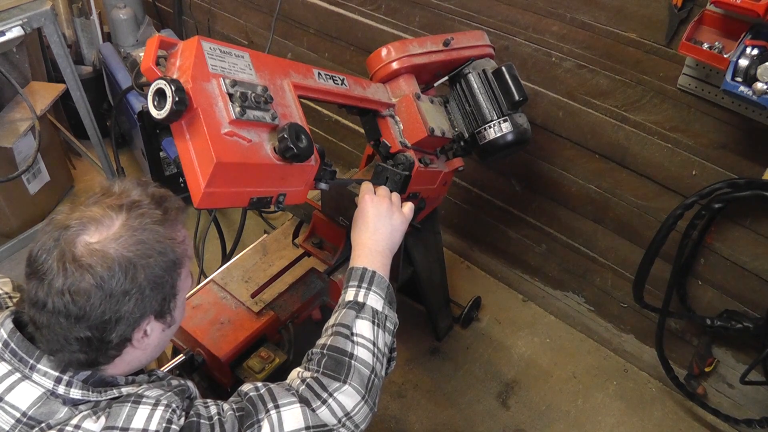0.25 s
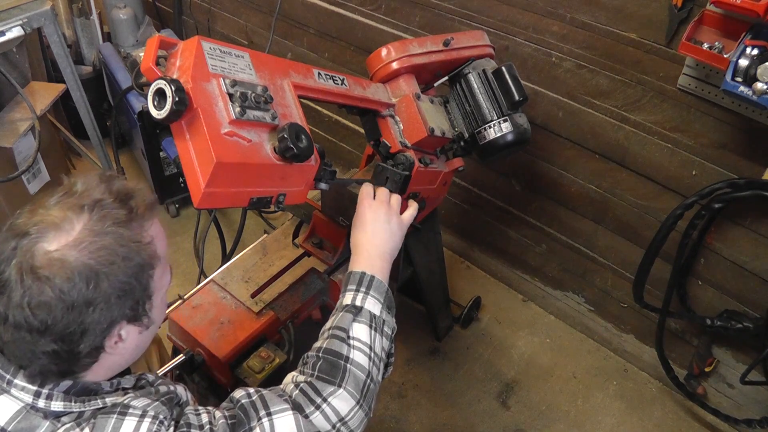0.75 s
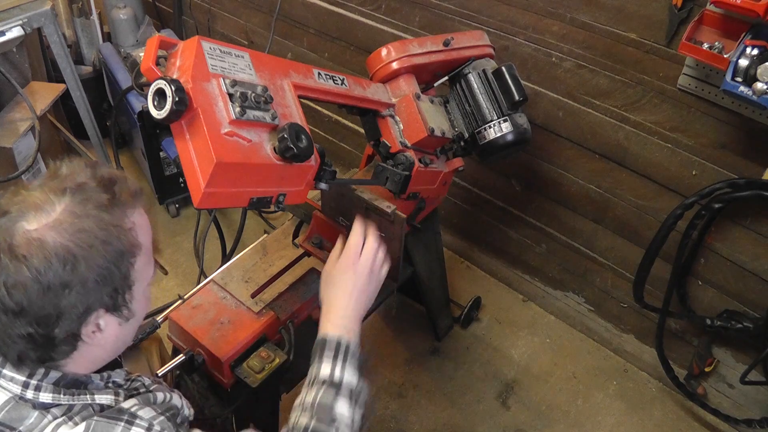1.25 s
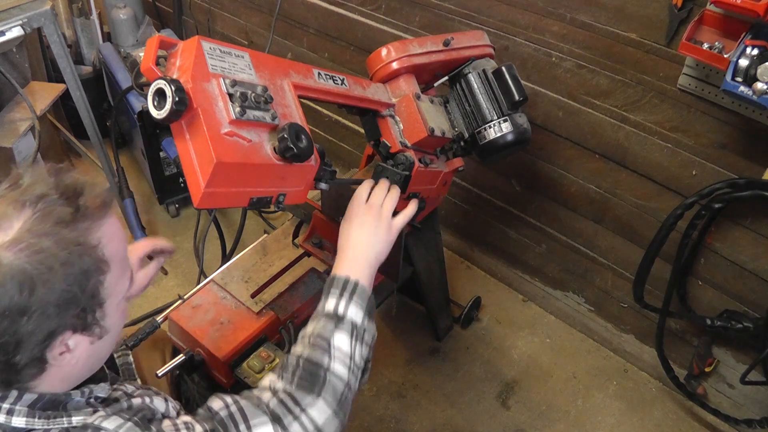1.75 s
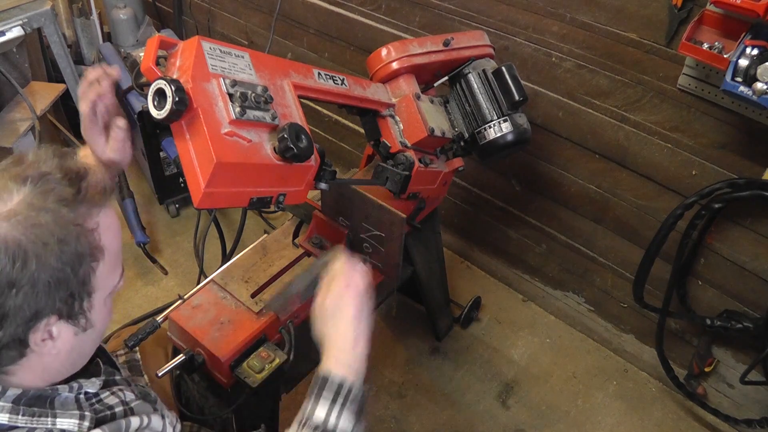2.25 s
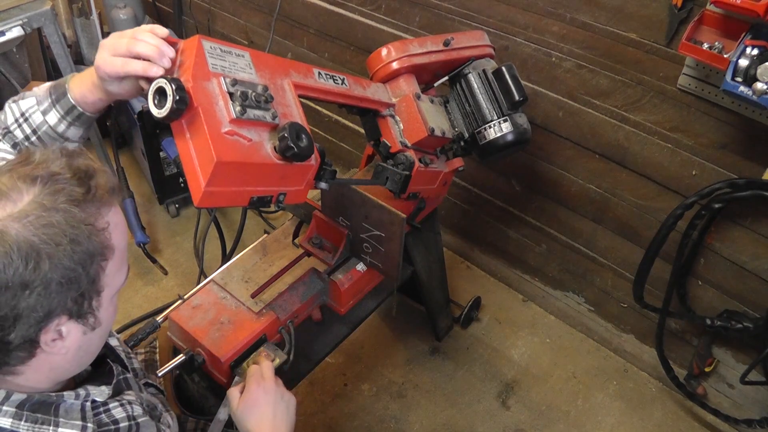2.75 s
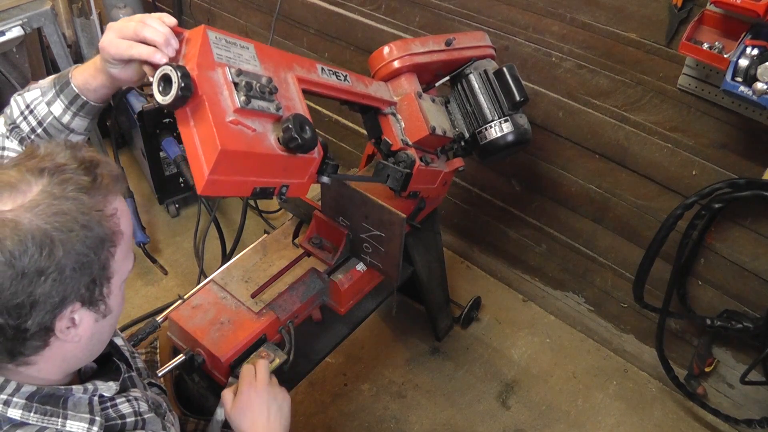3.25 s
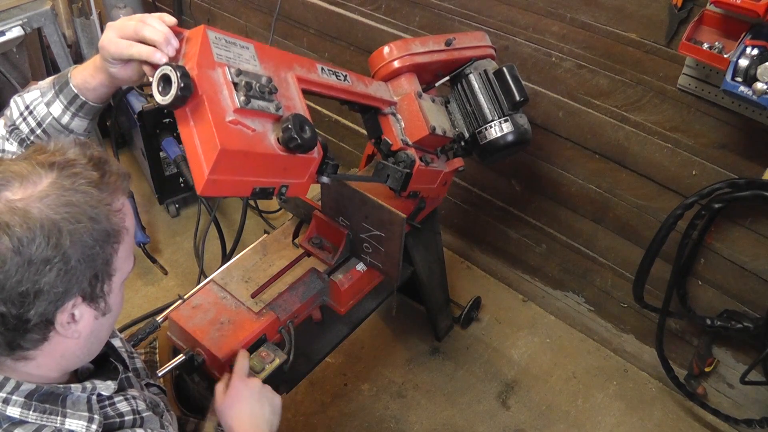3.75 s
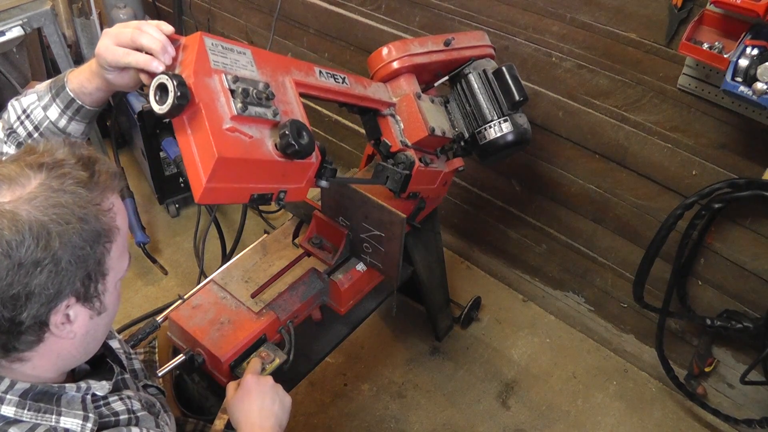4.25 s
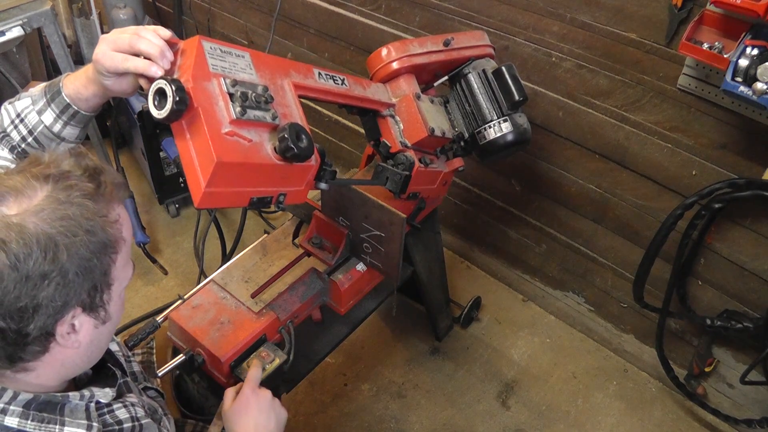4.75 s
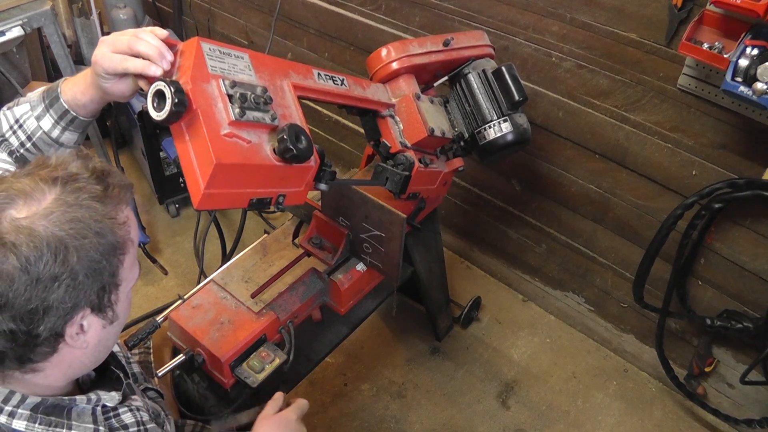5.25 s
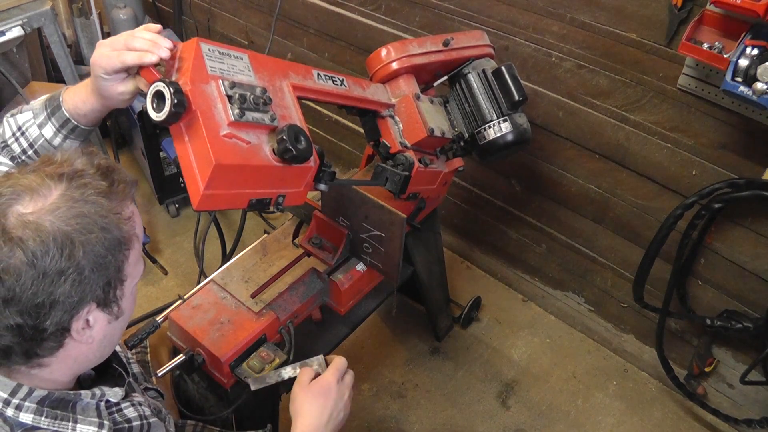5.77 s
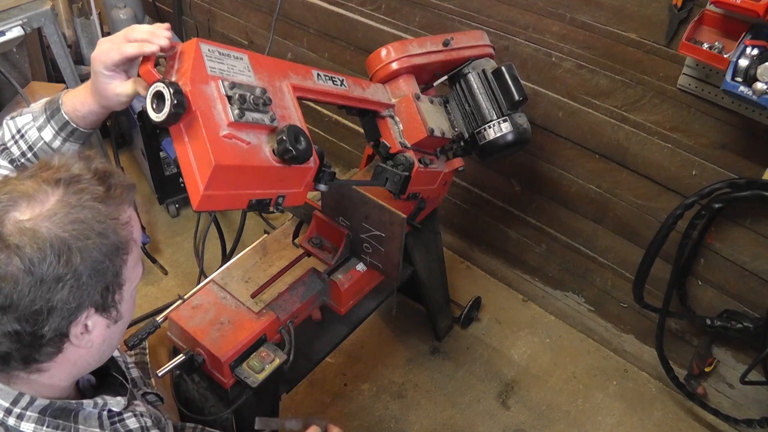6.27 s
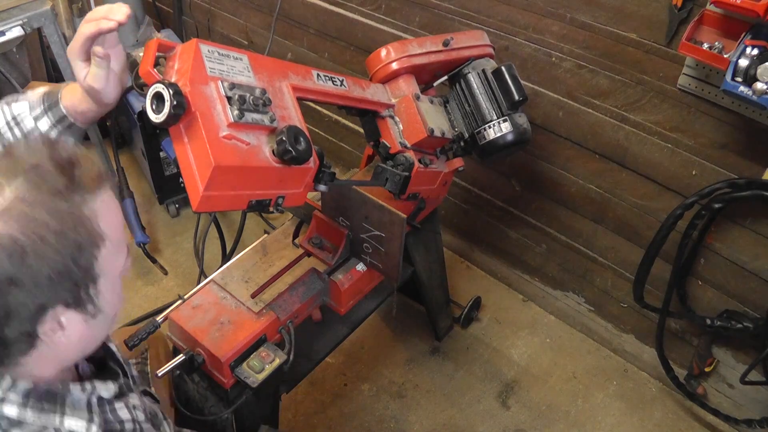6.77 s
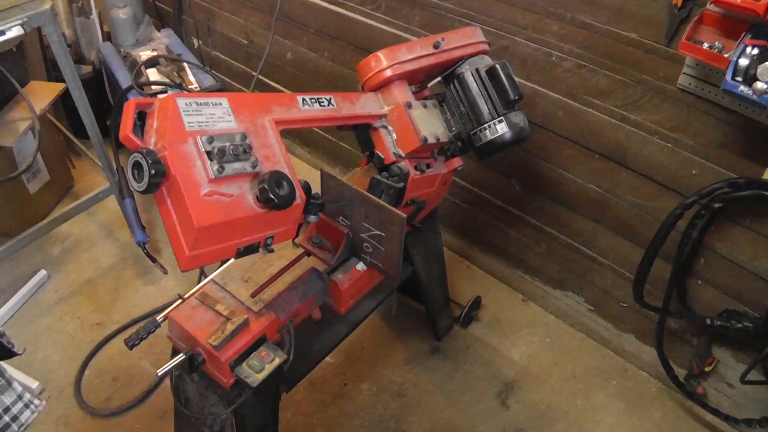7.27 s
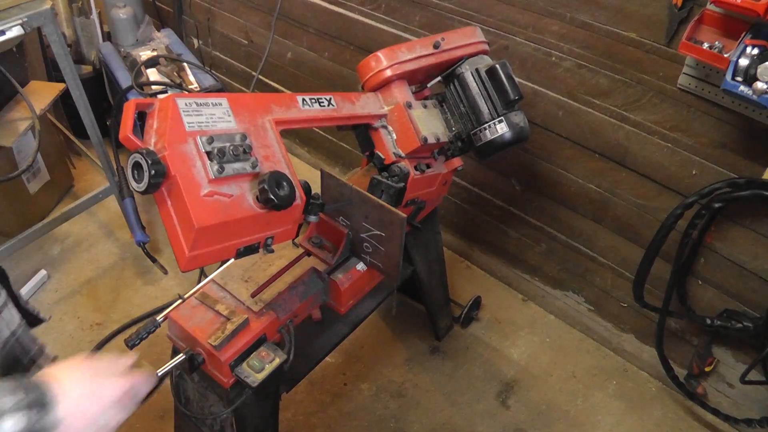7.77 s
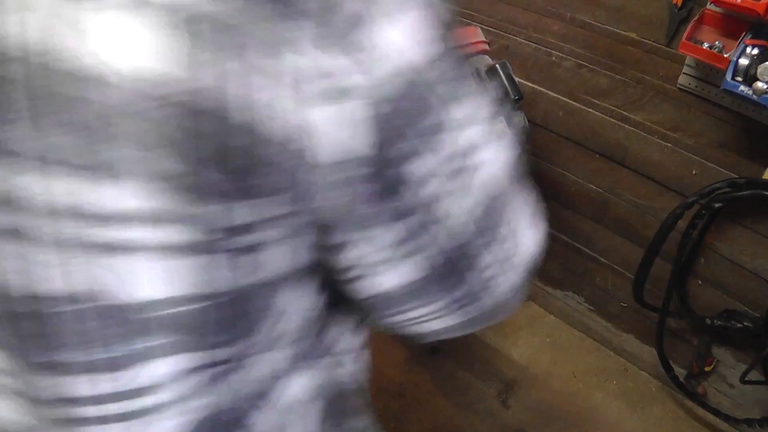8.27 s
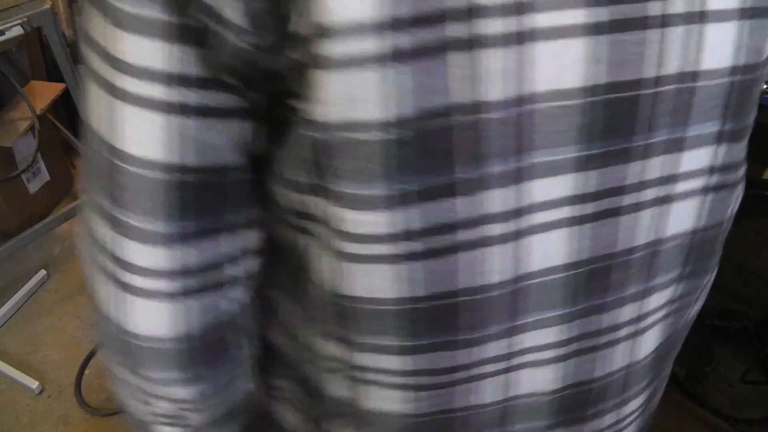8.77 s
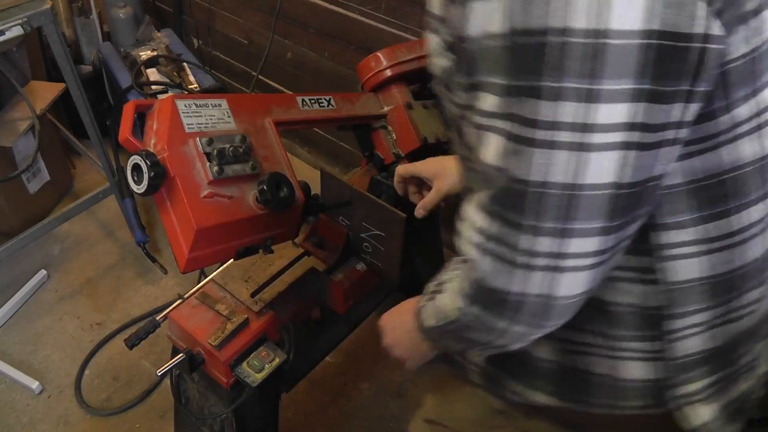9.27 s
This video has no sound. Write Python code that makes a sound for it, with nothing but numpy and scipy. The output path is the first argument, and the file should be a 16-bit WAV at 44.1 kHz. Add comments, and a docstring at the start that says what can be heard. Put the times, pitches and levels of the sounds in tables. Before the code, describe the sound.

Two short, ringing scrapes of steel come over faint room air and a soft sleeve rustle. Light knocks on a metal frame follow, then the snap of a switch. A band saw runs up and chews through a metal plate nearby, its teeth rattling and its motor humming. After a very brief dropout the cut continues deeper, with more high blade chirps, in a small workshop.

```python
"""A steel plate scrapes twice along a band saw's vice, over faint workshop air and a rustling sleeve.
Knocks ring the cast frame, the switch snaps, the saw runs up and cuts. Teeth rattle frame and plate,
the rubbing blade chirps and squeals, the motor hums under load.
Near 7.3 s the sound drops out twice, briefly, and the cut goes on deeper."""
import sys
import numpy as np
from scipy import signal
from scipy.fft import rfft, irfft, next_fast_len
from scipy.io import wavfile
from scipy.ndimage import uniform_filter1d

SR = 44100
rng = np.random.default_rng(int(sys.argv[2]) if len(sys.argv) > 2 else 0)


def dump(signal):
    """Clip the signal to [-1, 1] and save it as 16-bit WAV at the path in sys.argv[1]."""
    limited = np.clip(np.atleast_2d(signal).T, -1, 1)
    pcm = np.round(limited * 32767).astype(np.int16)
    wavfile.write(sys.argv[1], SR, pcm)


N = 419391

# (frequency [Hz], nominal width [Hz], shallow cut [dB], deep cut [dB], knocked [dB])
FRAME_MODES = [(114.4, 8.4, -27.5, -28.5, -39), (181.7, 11.6, -31, -17, -20), (214, 17, -18.5, -40, -21),
               (387, 9.6, -16.5, -34, -12), (397.2, 19, -8.5, -6.5, -4), (477, 49, -10, -7.5, -10.5),
               (520.3, 24.5, -7, -8, -4), (554.6, 29, -11.5, -19.5, -14), (631, 87, -14.5, -10, -16),
               (720, 71, -16, -9.5, -19), (921, 100, -14.5, -14, -38), (1029, 84, -11, -16, -13),
               (1513, 110, -17.5, -13, -10), (1902, 21, -38, -17, -31), (1980, 77, -19, -21.5, -27),
               (2196, 48, -21, -28, -18), (2830, 280, -22.5, -19.5, -15), (3157, 80, -20, -20.5, -11),
               (3370, 73, -26.5, -25.5, -32), (4220, 51, -32, -46, -21), (5700, 57, -27.5, -25.5, -20),
               (6410, 650, -22, -19, -4), (8450, 90, -41, -42, -40), (10800, 100, -43, -39, -40),
               (15000, 50, -47, -55, -23.5)]
CUT_SPECTRUM = [(40, -54), (90, -49), (150, -15.5), (250, -9), (330, -20), (500, -7), (900, -8),
                (1500, -12.5), (2500, -15.5), (4500, -20), (7000, -34.5), (9000, -34), (12000, -48),
                (15800, -61)]  # (frequency [Hz], density [dB])
TOOTH_BITE = [(4.21, -8), (4.242, -16.5), (4.376, -21.5), (4.415, -8.5), (4.432, 5), (4.602, -10.5),
              (4.634, 0.5), (4.72, -.5), (5.6, .5), (5.95, -0.5), (6.1, 0.2), (6.4, 0.5), (7.27, 0),
              (7.34, -1), (7.45, 0.5), (8.2, -0.5), (9.05, 0.5), (9.3, 1.5), (9.51, 1.5)]  # two lunges, then nearly even: (time [s], level [dB])
# bed, frame, teeth, chips: (shallow cut [dB], deep cut [dB], bite [dB/dB], wobble [dB], flicker [dB])
SAW_BANDS = [(-21.5, -21.5, .5, 0, 1.12), (-22, -23.5, 0.68, 0.1, 0.47), (-26, -28, 0.88, 0.56, 1),
             (-42, -40.5, 0.9, 1.3, 0.9)]
BED_BOOMS = [(4.255, 3), (4.28, 2.6), (4.305, 4.3), (4.328, 4), (4.39, 3), (4.5, 2.2), (4.7, 1.2),
             (4.87, 2.7), (5.03, 1.8), (5.18, 2), (5.28, 2), (5.59, 3.4), (5.645, 5.7), (5.74, 2.3),
             (6.14, 2), (6.205, 4), (6.62, 2.3), (6.92, 2.5), (7.1, 1.5), (7.47, 1.8), (7.62, 3.4),
             (7.725, 2.6), (8.01, 1.5), (8.245, 1.7), (8.35, 1.5), (8.48, 6), (8.56, 5.8), (8.62, 5.4),
             (8.77, 6.7), (8.85, 1.7), (8.98, 6.6), (9.21, 4.6), (9.46, 1.6)]  # (time [s], boost [dB])
CHIP_TREND = [(4.6, 3), (5.3, 2.5), (5.8, -1), (7.2, 0), (7.5, 1.5), (8.15, 2.5), (8.35, -1), (9.05, -3),
              (9.4, 0)]  # (time [s], gain [dB])
CHIP_SPRAYS = [(5.14, 3), (5.3, 2.5), (5.6, 4), (5.92, 4), (6.08, 6), (6.75, 3.6), (6.9, 5.2), (7.2, 2.1),
               (8.15, 2.5), (8.5, 2.6), (8.63, 2.4), (8.72, 3), (8.92, 6.3), (9.25, 3.5)]  # (time [s], boost [dB])
BLADE_CATCHES = [(4.4218, -39, -47), (4.482, -41, -41), (4.6273, -25.5, -34), (4.6667, -32, -39),
                 (4.766, -29, -34), (6.2651, -33, -47), (6.89, -31, -41), (7.409, -28, -47),
                 (7.481, -25, -36), (7.7303, -24, -31), (7.8001, -33, -36), (7.849, -41, -42),
                 (7.880, -27, -36), (7.9797, -22.5, -31.5), (8.0585, -29, -35), (8.1284, -26.5, -38.5),
                 (8.215, -39, -46), (8.3693, -32, -42), (9.102, -31, -47), (9.226, -28, -43)]  # (time [s], hiss [dB], top band [dB])
BLADE_MODES = [(10200, -11, .03), (11100, -19, 0.027), (12700, -6, .03), (14300, -4, 0.048),
               (15000, 1, .04)]  # (frequency [Hz], gain [dB], t60 [s])
BLADE_SQUEALS = [(6.1, -38), (6.26, -39.5), (6.47, -39), (6.76, -41), (6.93, -37), (7.74, -36.5),
                 (7.81, -36), (7.9, -35), (7.99, -34), (8.07, -34), (8.39, -41), (8.47, -35), (8.545, -37),
                 (8.65, -38), (8.72, -31), (9.26, -40)]  # (time [s], level [dB])
MOTOR_LOAD = [(4.4, -54), (4.47, -40), (5.2, -45), (5.37, -38), (5.9, -44.5), (6.06, -31), (6.21, -43),
              (6.39, -34), (6.83, -39), (6.95, -32), (7.16, -27), (7.3, -31.5), (7.9, -28.5), (8.4, -27.5),
              (8.62, -24), (8.85, -25.5), (9.2, -34), (9.42, -24.5), (9.51, -35)]  # hum: (time [s], level [dB])
PLATE_SONG = [(4.4, -51), (4.46, -30), (4.62, -33), (4.8, -25.5), (5.15, -28), (5.4, -29), (6.1, -32.5),
              (6.7, -35), (7.0, -27), (7.28, -30), (7.34, -52), (9.51, -46.5)]  # (time [s], level [dB])
PLATE_FLARE = [(4.42, -44), (4.46, -44), (4.7, -52), (4.87, -44), (5.0, -44), (5.15, -37.5), (5.3, -43),
               (5.43, -39), (5.62, -39), (5.75, -57), (6.4, -51), (7.28, -52)]  # high ring, shallow cut: (time [s], level [dB])
PLATE_SHOVES = [
    [(0.84, -73, -71, -77), (0.848, -44, -57, -61), (0.86, -33.5, -54, -49), (0.884, -31.5, -52, -54),
     (0.892, -33, -60, -55), (0.936, -29, -48, -46), (0.944, -27, -37, -39), (1.0, -27, -35.5, -43),
     (1.062, -29, -49, -67), (1.078, -35, -44, -57), (1.09, -36, -59, -66), (1.174, -46, -61, -75),
     (1.25, -51, -70, -74)],
    [(1.93, -71, -67, -61), (1.95, -42, -65, -63), (1.964, -39, -60, -62), (2.0, -46, -63, -66),
     (2.014, -38, -45, -58), (2.032, -34.5, -32.5, -41.5), (2.094, -23, -32.5, -24.5),
     (2.11, -26, -29, -25), (2.124, -22, -34, -31), (2.13, -29.5, -39, -23), (2.156, -28.5, -35.5, -36),
     (2.242, -41.5, -54, -45.5), (2.268, -49, -51, -51), (2.35, -47, -59, -58)],
]  # a list per shove: (time [s], body [dB], middle [dB], treble [dB])
PLATE_MODES = [(382.6, -7, -3.5, 0.69), (463.5, -7, -9, 0.33), (520, 0.5, -6, 0.14), (593, -8, -22, 0.17),
               (682, -9, -31, 0.15), (812, -16, -3, 0.17), (939, -7.5, -1, 0.15), (1196, -13, -7.5, 0.18),
               (1570, 1, -5.5, 0.21), (2250, -13, -7, 0.096), (2740, -16, -3, 0.12), (3270, -5, -8, 0.088),
               (4255, -13, -4, 0.069), (4300, -15, -4, 0.073), (4560, -5, -15, 0.072), (5650, -7, 1, 0.037),
               (6260, -19, -24, .08), (6740, -21, -10, .07), (8650, -9, -13, .06), (9800, -11, -15, 0.055),
               (11400, -15, -15, 0.067), (13420, -25, -30, .05)]  # (frequency [Hz], first shove [dB], second shove [dB], t60 [s])
PLATE_JOLTS = [(.861, -34), (.884, -38), (.918, -38), (.941, -26), (2.022, -30), (2.052, -26), (2.129, -16)]  # catch and jump: (time [s], level [dB])
GRIND_SPECTRUM = [(59, -52), (100, -44), (450, 10), (2400, -8.5), (2730, -6), (3750, -15.5), (5720, -17.5),
                  (13600, -38.5), (15800, -63)]  # (frequency [Hz], density [dB])
FRAME_KNOCKS = [(2.893, -26, 3900, 0.39), (2.914, -27.5, 720, 0.3), (3.051, -41, 794, 0.99),
                (3.391, -48.5, 500, 0.55), (3.925, -40, 3000, 0.09), (3.996, -30, 1100, 0.6),
                (4.159, -33, 1160, 0.93), (4.205, -15, 11500, 0.27)]  # hand, switch last: (time [s], level [dB], low-pass [Hz], t60 [s])
SWITCH_MODES = [(1030, -10, 0.086), (1440, 7, 0.11), (1500, 4.5, 0.13), (3500, -10, 0.02), (3780, -11, .02),
                (4300, 1, 0.06), (5100, -12, 0.054), (6200, -7, 0.044), (7640, -22, .03), (8522, -20, .06)]  # (frequency [Hz], gain [dB], t60 [s])
SLEEVE_RUSTLES = [(.57, -70, .04, 5500), (1.403, -65, 0.21, 4300), (1.867, -61.5, 0.14, 4300),
                  (2.378, -56, 0.12, 4300), (2.7, -65, 0.35, 4300), (3.575, -61, .025, 6500)]  # (time [s], level [dB], half length [s], centre [Hz])
AIR_SPECTRUM = [(18, -57), (30, -24), (100, -12.5), (137, -13), (174, -2), (238, -7), (344, -4.5),
                (413, -11), (1240, -22), (1380, -20), (1620, -22.5), (1790, -22.5), (4200, -33),
                (12500, -33.5), (15800, -32)]  # (frequency [Hz], density [dB])
AIR_COHERENCE = [(60, -0.079), (130, 0.26), (290, 0.65), (640, 0.19), (1410, 0.076), (3100, 0.92),
                 (6820, 0.98), (15000, 0.12)]  # (frequency [Hz], left-right correlation [-1..1])
AIR_STIR = [(0, -2), (.4, 1), (.7, 0.5), (1.4, 4), (1.8, 3), (2.6, 7.5), (3.2, 1), (3.8, 1.5)]  # midrange: (time [s], gain [dB])
AIR_RINGS = [(2230, -81, .04), (2600, -83, .04), (3330, -100, .03), (4680, -89, .07), (5980, -84, .07),
             (7250, -90, .07)]  # (frequency [Hz], level [dB], t60 [s])
MACHINE_TONES = [(102.3, -69), (172.3, -61), (199.2, -67), (349.9, -62), (1362, -82), (1384, -76)]  # (frequency [Hz], level [dB])
STEREO_WIDTH = [(30, 10), (60, 10), (110, -2), (250, -8.5), (500, -7.5), (1200, -4.5), (2400, -6),
                (4400, -14), (6000, -20.5), (8000, -3.5), (11000, -1.5), (15000, -6)]  # (frequency [Hz], side gain [dB])
NOTCH_CENTRES = [345, 1790, 2375, 3075]  # (frequency [Hz])
NOTCH_SHAPES = [(35, -0.5), (87.5, -9.5), (127, -9), (70, -17)]  # (width [Hz], gain [dB])
DROPOUTS = [(7.2875, 7.3077, 1), (7.324, 7.3285, .93)]  # (start [s], end [s], depth [0..1])

SPIN_UP_S, BOOM_S, SPRAY_S, CHIRP_S = 0.052, 0.019, 0.035, 0.014
SQUEAL_HZ, SQUEAL_T60_S, SQUEAL_S = 7065, 0.0071, 0.013
HISS_SHALLOW_DB, HISS_DEEP_DB = -44, -41.5
HUM_HZ, BUZZ_HZ, BUZZ_DB = 242.7, 100.6, -46
SONG_HZ, SONG_T60_S, FLARE_HZ, FLARE_T60_S = 1107, 0.18, 4220, 0.035
JOLT_S, SNAP_S, SNAP_DB = 0.004, 0.0015, 6.5
AIR_DB, WHINE_END_S = -54, 0.73
ROOM_T60_S, ROOM_DB, PAN_DB = 0.24, -8, 0.13
BASS_CUT_HZ, TOP_HZ = 45, 15750

T, FFT_SIZE = np.arange(N) / SR, next_fast_len(N + SR // 2)
HZ = np.maximum(np.fft.rfftfreq(FFT_SIZE, 1 / SR), 1)
SAW_START_S, DEEP = TOOTH_BITE[0][0], T > DROPOUTS[0][0]


def saw():
    """Teeth strike steel in a dense rattle; bed, frame, teeth and chips each carry one band."""
    strikes = grit(2.24)
    rings = 0
    for hz, width_hz, shallow_db, deep_db, _ in FRAME_MODES:
        gain = undb(np.where(DEEP, deep_db, shallow_db) + 1.3 * walk(7))
        drive = np.roll(strikes, rng.integers(N))  # each mode is shaken from its own place
        rings += gain * mode(drive, hz, 2.4 / width_hz)
    rattle = rings + level(shape(strikes, undb(spectrum(CUT_SPECTRUM))), -3)
    above_bed, upper, top = above(558, 622), HZ > 1600, above(4440, 9900)
    masks = 1 - above_bed, above_bed - upper, upper - top, top
    load, bite_db = walk(20), curve(TOOTH_BITE)
    bands = []
    for mask, (shallow_db, deep_db, follow, wobble_db, flicker_db) in zip(masks, SAW_BANDS):
        swing_db = follow * bite_db + wobble_db * load + flicker_db * walk(30)
        bands.append(level(shape(rattle, mask), 0) * undb(np.where(DEEP, deep_db, shallow_db) + swing_db))
    bed, frame, teeth, chips = bands
    running_s = np.maximum(T - SAW_START_S, 0)
    bed *= (1 - np.exp(-running_s / SPIN_UP_S)) * undb(bumps(BED_BOOMS, BOOM_S))
    chips *= undb(curve(CHIP_TREND) + bumps(CHIP_SPRAYS, SPRAY_S))
    lone_chips = level(shape(grit(5), top), -57) * undb(4 * DEEP + bite_db + 2.7 * walk(13))
    return (T > SAW_START_S) * (bed + frame + teeth + chips + lone_chips)


def blade_chirps():
    """The blade catches on the edge: short rubs hiss and ring it."""
    hiss, sharp, rub = np.zeros(N), np.zeros(N), grit(3.1)
    t = T[:SR // 8]
    for s, hiss_db, top_db in BLADE_CATCHES:
        i = int(s * SR)
        burst = rub[i:i + len(t)] * np.exp(-(t / CHIRP_S) ** 2)
        hiss[i:i + len(t)] += undb(hiss_db) * burst
        sharp[i:i + len(t)] += undb(top_db) * burst
    rings = sum(undb(db) * mode(hiss if hz < 13000 else sharp, hz, t60) for hz, db, t60 in BLADE_MODES)
    top = above(9300, 12600)
    return shape(hiss, above(3000, 6400) - top) + shape(sharp, top) + undb(-12) * rings


def blade_squeal():
    """One blade resonance: a thin hiss that follows the bite, with brief squeals."""
    hiss_db = np.where(DEEP, HISS_DEEP_DB, HISS_SHALLOW_DB) + curve(TOOTH_BITE) + 2 * walk(25)
    squeals = bumps([(s, undb(db)) for s, db in BLADE_SQUEALS], SQUEAL_S)
    return mode(grit(0.81), SQUEAL_HZ, SQUEAL_T60_S) * ((T > SAW_START_S) * undb(hiss_db) + squeals)


def motor():
    """A hum, louder under load; the windings buzz at twice the mains frequency."""
    hum = sine(HUM_HZ, 0, waver_hz=2.495, waver_db=1.6) * envelope([MOTOR_LOAD]) * undb(1.2 * walk(6))
    buzz = sine(BUZZ_HZ, BUZZ_DB, waver_hz=2.496, waver_db=2.3)
    return hum + buzz * np.clip((T - 4.3) / 0.33, 0, 1)


def plate_song():
    """The plate's free top sings in two narrow bands, mainly in the shallow cut."""
    flare = mode(grit(2.1), FLARE_HZ, FLARE_T60_S) * envelope([PLATE_FLARE]) * undb(2.4 * walk(21))
    song = 0.8 * mode(rng.standard_normal(N), SONG_HZ, SONG_T60_S)
    song += sine(SONG_HZ, -3.5, waver_hz=3.52, waver_db=1.9)
    return flare + song * envelope([PLATE_SONG])


def shoves():
    """Stick-slip scraping rings the plate, which leans differently in each shove."""
    slips = grit(1.6) * undb(1.44 * walk(59.1))
    low, middle, high = (slips * envelope(PLATE_SHOVES, column) for column in (1, 2, 3))
    middle *= undb(5.5)
    grind = level(undb(spectrum(GRIND_SPECTRUM)), 0)
    upper, top = above(960, 1200), above(2200, 3200)
    scrape = undb(-4.5) * shape(low, grind * (1 - upper)) + shape(middle, grind * (upper - top))
    scrape += undb(4.5) * shape(high, grind * top)
    jolts = slips * sum(undb(db) * decay(s, JOLT_S) for s, db in PLATE_JOLTS)
    second = T > PLATE_SHOVES[1][0][0]
    rings = 0
    for hz, first_db, second_db, t60 in PLATE_MODES:
        drive = low if hz < 1300 else middle if hz < 2500 else undb(2.2) * high + jolts
        rings += undb(np.where(second, second_db, first_db)) * mode(drive, hz, t60)
    return scrape + undb(-8) * rings


def knocks():
    """Decaying cracks, dull for a soft hand, ring the frame; the last also rings the switch box."""
    cracks, t = np.zeros(N), T[:SR // 2]
    for s, db, cutoff_hz, t60 in FRAME_KNOCKS:
        i = int(s * SR)
        lowpass = signal.butter(4, cutoff_hz, fs=SR, output="sos")
        burst = level(signal.sosfilt(lowpass, rng.standard_normal(len(t))), db - 17)
        cracks[i:i + len(t)] += burst * (1000. ** (-t / t60) + 0.58 * np.exp(-t / 0.00099))
    rings = sum(undb(db) * mode(cracks, hz, 3.1 / width_hz) for hz, width_hz, *_, db in FRAME_MODES)
    snap = cracks * decay(FRAME_KNOCKS[-1][0], SNAP_S) * undb(SNAP_DB)
    rings += undb(9.5) * sum(undb(db) * mode(snap, hz, t60) for hz, db, t60 in SWITCH_MODES)
    return shape(cracks + snap, np.clip(HZ / 450, 0, 1) ** 2) + undb(-5.5) * rings


def sleeve():
    """Cloth crackles softly as the arm moves; short rustles are narrower in band."""
    cloth = grit(2.5) * undb(1.7 * walk(30))
    rustles = 0
    for s, db, half_s, hz in SLEEVE_RUSTLES:
        t60 = (2.2 if half_s > 0.1 else 7.7) / hz
        rustles += level(mode(cloth, hz, t60), db) * bumps([(s, 1)], half_s)
    return rustles


def workshop():
    """Air and distant machines, in stereo; the whine above 1 kHz soon stops."""
    coherence = np.clip(spectrum(AIR_COHERENCE), -0.95, 0.95)
    colour = undb(spectrum(AIR_SPECTRUM))
    mid, side = (shape(rng.standard_normal(N), colour * np.sqrt(1 + k * coherence)) for k in (1, -1))
    air = level(np.array([mid + side, mid - side]), AIR_DB)
    air += shape(air, above(320, 570) - above(2300, 5900)) * (undb(curve(AIR_STIR)) - 1)
    air += sum(undb(db) * mode(rng.standard_normal(N), hz, t60) for hz, db, t60 in AIR_RINGS)
    for hz, db in MACHINE_TONES:
        air += sine(hz, db, waver_hz=1.64, waver_db=2.3) * (1 if hz < 1000 else T < WHINE_END_S)
    return air


def room(x):
    """Walls return decaying washes, evened in broad colour: (mid, side)."""
    tails = rng.standard_normal((2, SR // 2)) * 1000. ** (-T[:SR // 2] / ROOM_T60_S)
    mid_wash, side_wash = rfft(tails / np.linalg.norm(tails, axis=1, keepdims=True), FFT_SIZE)
    dull = 1 / (1 + (HZ / 6000) ** 2)
    even = lambda gain: gain / np.sqrt(uniform_filter1d(np.abs(gain) ** 2, size=1600))
    mid = shape(x, undb(0.38) * even(1 + undb(ROOM_DB) * dull * mid_wash))
    return mid, shape(x, undb(spectrum(STEREO_WIDTH)) * even(side_wash))


def undb(db):
    """dB to gain."""
    return 10 ** (np.asarray(db) / 20)


def level(x, db):
    """Scale to an rms level."""
    return x * undb(db) / np.sqrt(np.mean(x ** 2))


def curve(table):
    """A time table at every sample."""
    return np.interp(T, *np.transpose(table))


def envelope(spans, column=1):
    """One dB column as a gain, silent outside the spans."""
    s, db = np.transpose(sum(spans, []))[[0, column]]
    return sum((T > span[0][0]) & (T < span[-1][0]) for span in spans) * undb(np.interp(T, s, db))


def bumps(rows, half_s):
    """Bell-shaped swells."""
    return sum(height * np.exp(-((T - s) / half_s) ** 2) for s, height in rows)


def decay(start_s, tau_s):
    """Sudden onset, exponential fall."""
    return (T > start_s) * np.exp(-np.abs(T - start_s) / tau_s)


def spectrum(table):
    """A frequency table at every bin."""
    hz, value = np.transpose(table)
    return np.interp(np.log(HZ), np.log(hz), value)


def above(from_hz, to_hz):
    """Ramp from 0 to 1 in log frequency."""
    return np.clip(np.log(HZ / from_hz) / np.log(to_hz / from_hz), 0, 1)


def shape(x, gain):
    """Weight every frequency."""
    return irfft(rfft(x, FFT_SIZE) * gain, FFT_SIZE)[..., :N]


def mode(x, hz, t60_s):
    """One resonance, unit power for unit noise."""
    r = np.exp(-np.log(1000) / (t60_s * SR))
    feedback = [1, -2 * r * np.cos(2 * np.pi * hz / SR), r * r]
    return np.sqrt((1 - r * r) / 2) * signal.lfilter([1, 0, -1], feedback, x)


def walk(rate_hz):
    """Random steps, smoothed twice; spread near 1."""
    hold = int(SR / rate_hz)
    steps = np.repeat(rng.standard_normal(N // hold + 1), hold)
    return 1.237 * uniform_filter1d(uniform_filter1d(steps, hold), hold)[:N]


def grit(spread_db):
    """Dense tiny impacts of uneven size."""
    return level(rng.standard_normal(N) * undb(spread_db * rng.exponential(size=N)), 0)


def sine(hz, db, waver_hz, waver_db):
    """A tone drifting in pitch and level."""
    phase = 2 * np.pi * np.cumsum(hz + waver_hz * walk(8)) / SR
    return np.sqrt(2) * np.sin(phase) * undb(db + waver_db * walk(9.1))


def scene():
    """All sources in the room; nearby reflections cancel in four notches."""
    sources = shoves() + knocks() + saw() + motor() + plate_song()
    mid, side = room(sources + blade_chirps() + blade_squeal() + sleeve())
    pan = undb([[PAN_DB / 2], [-PAN_DB / 2]])
    stereo = np.array([mid + side, mid - side]) * pan + workshop()
    notches_db = sum(db * np.exp(-2 * ((HZ - hz) / width_hz) ** 2)
                     for hz, (width_hz, db) in zip(NOTCH_CENTRES, NOTCH_SHAPES))
    return shape(stereo, undb(notches_db) / np.sqrt(1 + (BASS_CUT_HZ / HZ) ** 4))


def record(dry):
    """Steep low-pass and two brief dropouts."""
    out = signal.sosfilt(signal.ellip(12, 0.2, 80, TOP_HZ, fs=SR, output="sos"), dry)
    muted = sum(depth * ((T > start_s) & (T < end_s)) for start_s, end_s, depth in DROPOUTS)
    return out * (1 - uniform_filter1d(muted, size=9))


dry = scene()
out = record(dry)
dump(out)
```